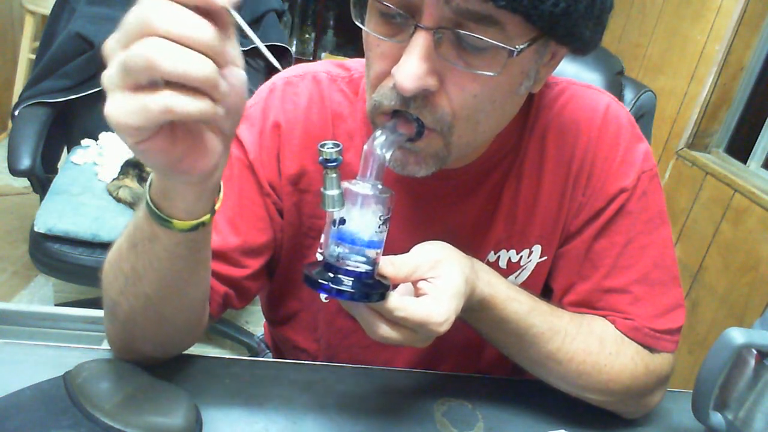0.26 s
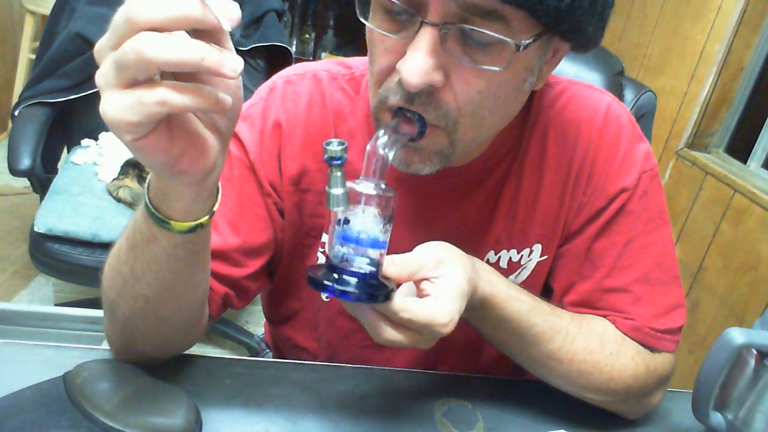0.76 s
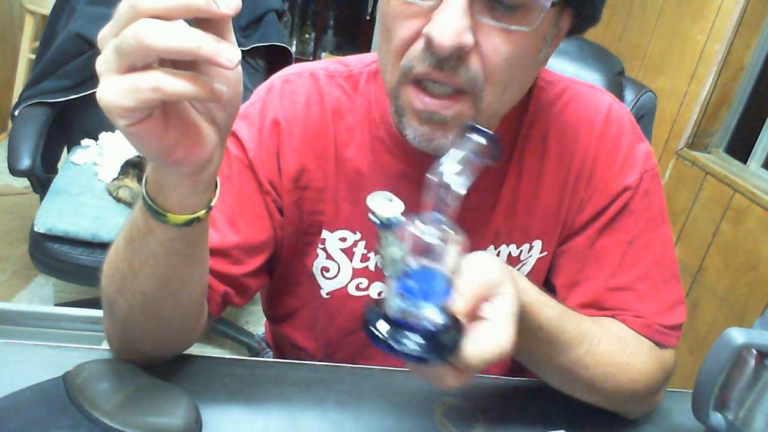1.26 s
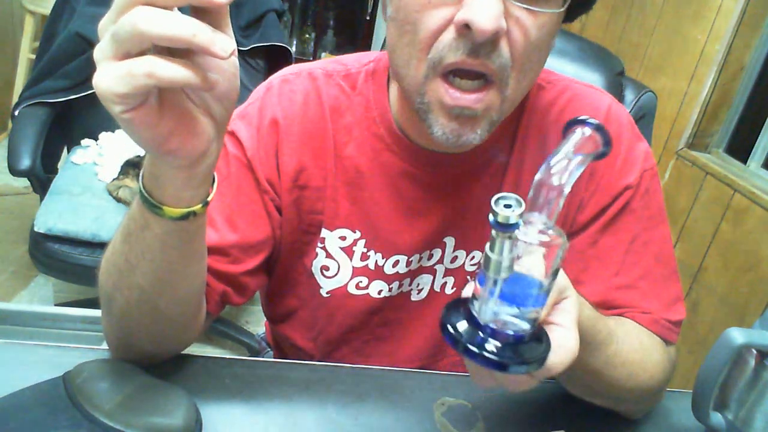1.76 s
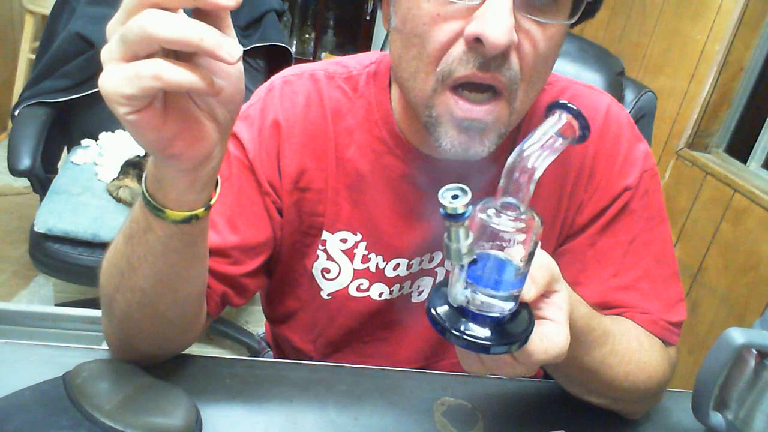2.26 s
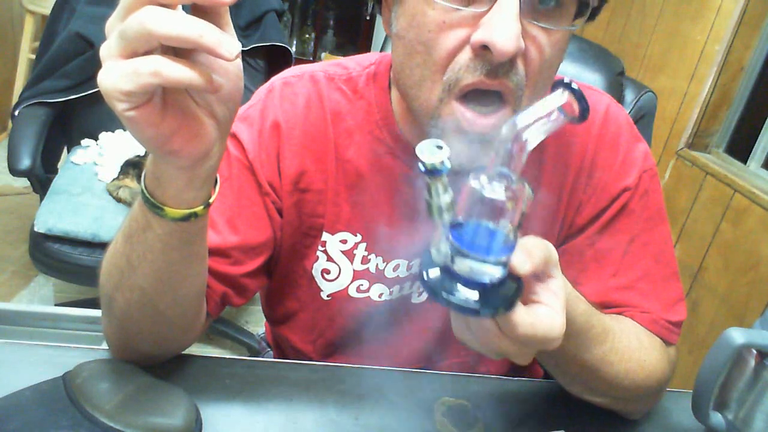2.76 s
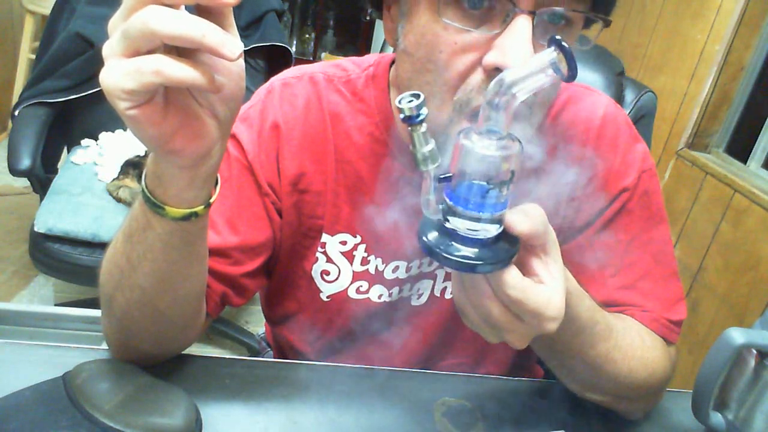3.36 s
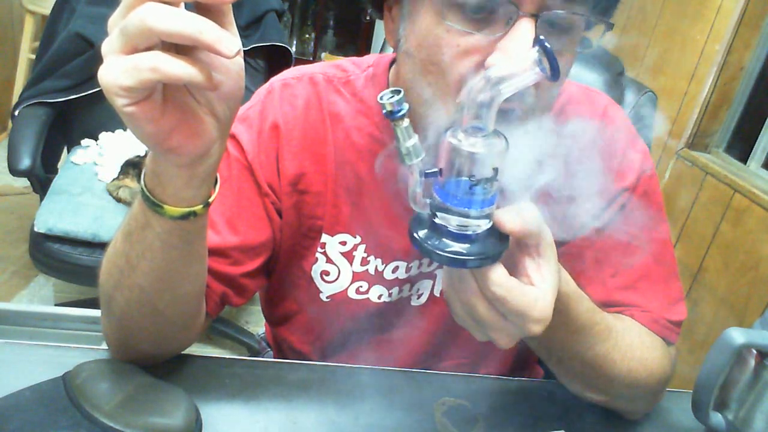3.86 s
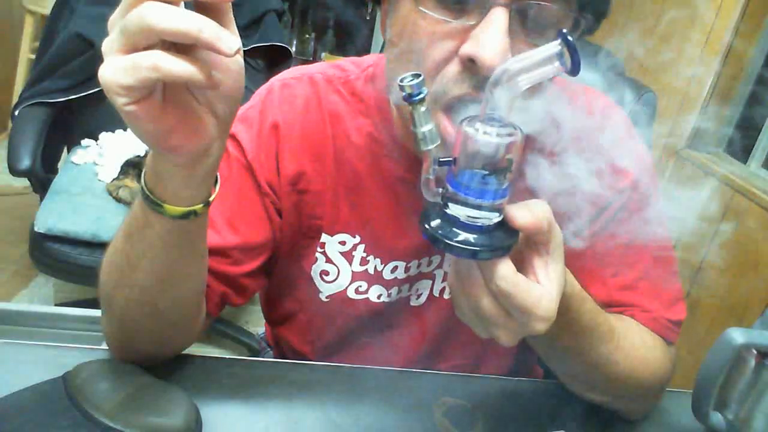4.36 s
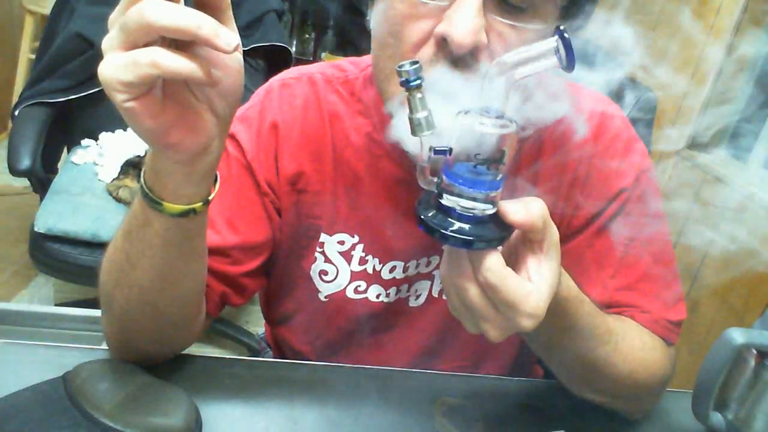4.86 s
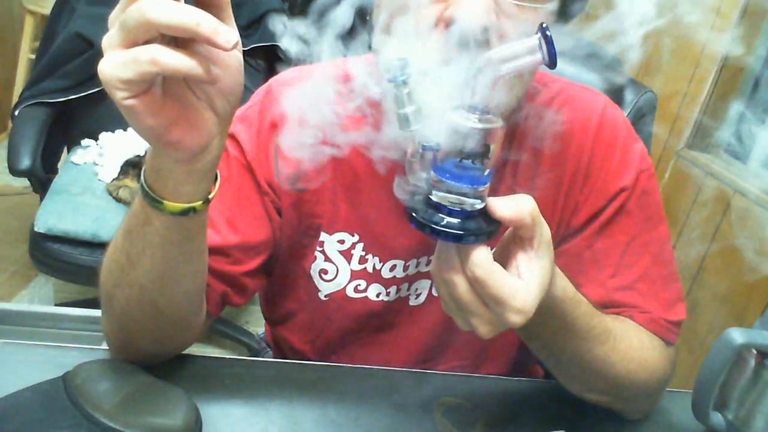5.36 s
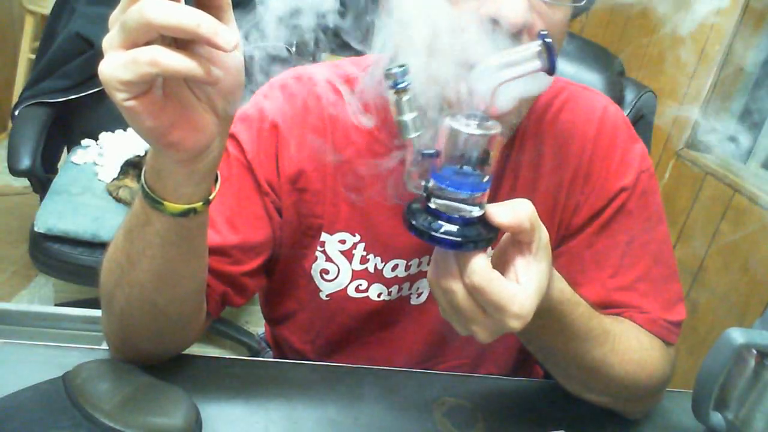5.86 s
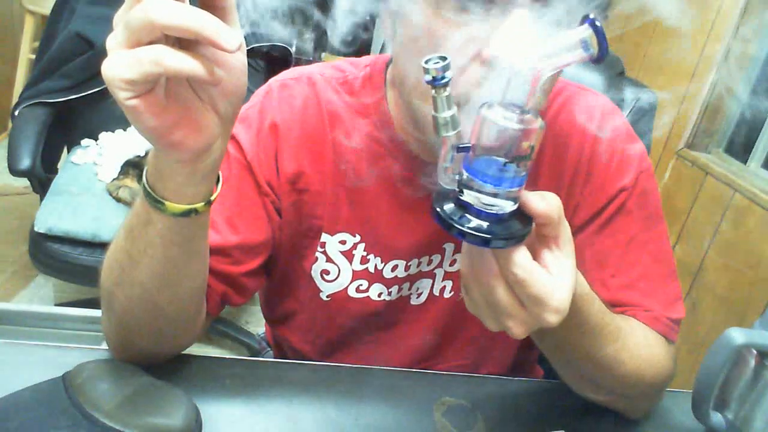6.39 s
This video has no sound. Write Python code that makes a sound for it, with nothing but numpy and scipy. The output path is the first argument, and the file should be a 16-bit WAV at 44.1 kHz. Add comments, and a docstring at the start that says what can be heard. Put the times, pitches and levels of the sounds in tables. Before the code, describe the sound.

From 0 to about 0.8 seconds, low rounded bubbles gurgle in a small glass water pipe, overlapping in a wet churn, with a narrow breathy high whistle strongest around 0.4 to 0.6 seconds. A small tick falls at 0.5, then a sharp one at 0.83 with a few weaker clicks until 1.0, and the bubbling is gone. All the way through to 6.6 seconds a fan rattles, nearly nine beats a second: dense, dry, hollow knocks around the midrange with light scraping fizz and occasional tiny pings. Motor and mains hum and soft room air sit below. Fainter ticks return near 4.1, 4.7 and 5.2. Very soft distant hoots appear near 1.5, 3.8 and 4.5, then higher, slightly rising ones at 5.8 and 6.3 to 6.6. The cheap close microphone adds steady hiss and thin whines, clearer around one second and after four; the small room gives a short reverberation.

```python
"""Rattling fan and a water pipe in a quiet room

A five-blade fan turns steadily; knocks and dense small blows of a loose part ring its housing every turn.
A small glass water pipe gurgles as decaying bubble tones and whistles as narrow noise for the first second.
It ticks sharply as it is put from the lips, with fainter ticks later; soft hoots come from far off.
Motors and mains hum under room air; a cheap microphone adds hiss, thin whines and an offset."""
import sys
import numpy as np
from scipy import signal
from scipy.fft import rfft, irfft
from scipy.io import wavfile
from scipy.ndimage import uniform_filter1d

SR = 44100
rng = np.random.default_rng(int(sys.argv[2]) if len(sys.argv) > 2 else 0)


def store_wav(level_fs):
    """Save 16-bit WAV to argv[1]."""
    pcm = np.round(np.clip(np.atleast_2d(level_fs), -1, 1) * 32767)
    wavfile.write(sys.argv[1], SR, pcm.T.astype(np.int16))


N = 292421

TURN_HZ, FIRST_KNOCK_S = 8.795, .030  # turns per second, and where the first turn begins
# Ringing modes of the fan housing. Each row: pitch in Hz, relative level in dB, t60 in seconds.
HOUSING_MODES = [(1150, -9, .05), (1190, -9, .05), (1230, -8, .05), (1290, -6.5, .05), (1345, -4, .05),
                 (1400, -3.5, .05), (1445, -5, .05), (1488, -3.5, .06), (1530, -4, .05), (1590, -2.5, .05),
                 (1645, -3, .05), (1700, -3, .05), (1760, -6, .05), (1830, -7.5, .05), (1940, -12, .06),
                 (2280, -19, .08), (2400, -17, .09), (2510, -15, .09)]
# The clearest knocks of the loose part. Each row: time in seconds, relative level in dB,
# pitch that the struck spot favours in Hz.
CLEAR_KNOCKS = [(0.0422, -45.8, 1460), (0.0601, -45.1, 1450), (0.0725, -47.1, 1510), (0.0921, -46.2, 1490),
                (0.1554, -43.7, 1440), (0.1865, -46.7, 1560), (0.2634, -44.0, 1490), (0.2755, -42.2, 1450),
                (0.2983, -47.3, 1490), (0.361, -47.5, 1510), (0.3807, -42.7, 1500), (0.412, -44.8, 1490),
                (0.437, -46.0, 1520), (0.489, -42.7, 1490), (0.5001, -43.0, 1460), (0.5327, -46.7, 1620),
                (0.6139, -42.5, 1480), (0.6251, -46.7, 1500), (0.6364, -45.7, 1520), (0.7222, -42.5, 1450),
                (0.7375, -43.5, 1530), (0.7512, -46.2, 1520), (0.8252, -42.5, 1550), (0.8416, -41.5, 1500),
                (0.8584, -45.3, 1580), (0.9469, -41.8, 1460), (0.9651, -42.7, 1540), (0.9856, -44.8, 1450),
                (1.0707, -42.9, 1430), (1.0899, -47.4, 1490), (1.1035, -45.7, 1510), (1.1723, -45.8, 1520),
                (1.1819, -42.9, 1470), (1.1897, -45.5, 1510), (1.2148, -46.9, 1570), (1.2359, -46.9, 1480),
                (1.29, -41.3, 1460), (1.3029, -43.1, 1560), (1.3167, -45.6, 1480), (1.3276, -46.3, 1550),
                (1.4049, -42.8, 1510), (1.4143, -46.0, 1520), (1.5144, -46.0, 1520), (1.5219, -42.5, 1460),
                (1.5334, -45.4, 1490), (1.5785, -45.0, 1430), (1.5905, -47.4, 1500), (1.6331, -41.6, 1450),
                (1.6472, -45.9, 1510), (1.6691, -46.3, 1510), (1.7494, -43.8, 1430), (1.7634, -45.2, 1480),
                (1.8093, -47.5, 1440), (1.8549, -43.3, 1550), (1.8715, -43.7, 1570), (1.9198, -45.4, 1490),
                (1.973, -43.4, 1470), (2.1007, -46.5, 1470), (2.1191, -46.6, 1550), (2.1463, -47.0, 1480),
                (2.1978, -46.1, 1510), (2.2065, -45.3, 1450), (2.2165, -46.5, 1490), (2.3141, -40.2, 1460),
                (2.3244, -44.0, 1440), (2.4503, -47.0, 1470), (2.4617, -45.8, 1590), (2.5386, -42.5, 1490),
                (2.5489, -41.5, 1480), (2.6659, -43.4, 1420), (2.6783, -45.3, 1530), (2.7639, -44.2, 1470),
                (2.7749, -46.4, 1450), (2.7943, -44.3, 1550), (2.8813, -45.3, 1500), (2.9128, -44.5, 1500),
                (2.9969, -41.4, 1490), (3.0168, -44.6, 1510), (3.0264, -45.9, 1520), (3.1063, -44.1, 1490),
                (3.1159, -42.7, 1450), (3.1354, -45.6, 1470), (3.231, -44.5, 1460), (3.2434, -47.4, 1470),
                (3.3372, -46.8, 1530), (3.3553, -43.5, 1410), (3.4474, -45.5, 1510), (3.4581, -44.7, 1410),
                (3.4723, -46.9, 1500), (3.5693, -40.8, 1450), (3.5799, -46.7, 1470), (3.6725, -45.2, 1490),
                (3.6921, -43.0, 1490), (3.7907, -43.0, 1500), (3.8084, -44.2, 1510), (3.8205, -45.4, 1500),
                (3.8366, -47.2, 1450), (3.9052, -43.1, 1480), (3.9221, -44.5, 1560), (4.0135, -46.1, 1520),
                (4.0222, -46.8, 1430), (4.1301, -44.6, 1470), (4.1418, -43.1, 1470), (4.1605, -45.9, 1490),
                (4.1807, -47.2, 1490), (4.2471, -44.7, 1460), (4.2637, -46.1, 1540), (4.2752, -47.3, 1510),
                (4.3537, -46.8, 1490), (4.3859, -46.3, 1450), (4.4716, -42.2, 1500), (4.4901, -44.9, 1490),
                (4.5117, -46.6, 1520), (4.6127, -45.3, 1610), (4.6963, -43.0, 1520), (4.7069, -43.6, 1460),
                (4.7269, -44.0, 1560), (4.814, -43.5, 1480), (4.8401, -47.2, 1500), (4.9346, -43.9, 1460),
                (5.0395, -43.2, 1500), (5.0512, -44.9, 1420), (5.1082, -46.4, 1480), (5.1553, -41.6, 1490),
                (5.1683, -43.1, 1490), (5.2746, -45.6, 1430), (5.2949, -46.2, 1480), (5.3287, -44.3, 1440),
                (5.3803, -42.0, 1500), (5.3985, -44.1, 1460), (5.4094, -45.7, 1530), (5.4201, -47.2, 1520),
                (5.4971, -44.8, 1460), (5.5119, -40.8, 1460), (5.6058, -44.9, 1450), (5.6144, -41.1, 1440),
                (5.6257, -43.7, 1490), (5.6715, -42.7, 1500), (5.7004, -46.3, 1430), (5.7267, -44.4, 1470),
                (5.7517, -46.7, 1460), (5.8427, -46.4, 1440), (5.8606, -46.0, 1450), (5.9559, -43.6, 1410),
                (5.9667, -46.5, 1520), (5.9782, -47.2, 1450), (6.0661, -43.9, 1410), (6.08, -46.8, 1530),
                (6.0906, -44.0, 1490), (6.105, -46.4, 1450), (6.1913, -42.7, 1500), (6.219, -46.6, 1520),
                (6.2313, -46.1, 1510), (6.2902, -42.9, 1500), (6.3088, -44.2, 1510), (6.3227, -46.5, 1500),
                (6.4073, -44.9, 1470), (6.4157, -45.5, 1420), (6.4341, -47.1, 1530), (6.4537, -46.0, 1530),
                (6.5136, -45.0, 1490), (6.5268, -44.9, 1460)]


def undb(db):
    """Gain of a level in dB."""
    return 10 ** (np.asarray(db) / 20)


def level(x, db):
    """Scale a sound to an rms level in dB."""
    return x * undb(db) / np.sqrt(np.mean(x ** 2))


def curve(table):
    """Draw the columns of a (seconds, value, ..) table as sample-by-sample automation."""
    s, *columns = np.transpose(table)
    return [np.interp(np.arange(N) / SR, s, column) for column in columns]


def coloured(points):
    """Noise shaped by (Hz, dB) points, joined on a log pitch axis and flat beyond the ends."""
    hz, db = np.transpose(points)
    bins_hz = np.maximum(np.arange(N // 2 + 1) * SR / N, 1)
    gain = undb(np.interp(np.log(bins_hz), np.log(hz), db))
    return irfft(rfft(rng.standard_normal(N)) * gain, N)


def band(x, lo_hz, hi_hz):
    """Band-pass with gentle slopes."""
    return signal.sosfilt(signal.butter(2, [lo_hz, hi_hz], "band", fs=SR, output="sos"), x)


def ring(x, hz, t60, rise_s):
    """One mode that builds up over the contact time and then decays."""
    spin = 2j * np.pi * hz / SR
    onset = np.exp(spin - 1 / (rise_s * SR))
    decay = np.exp(spin - np.log(1000) / (t60 * SR))
    return signal.lfilter([1 - abs(onset)], np.poly([onset, decay]), x).imag


def walk(rate):
    """Random levels held for 1 / rate seconds and slewed twice."""
    k = int(SR / rate)
    steps = np.repeat(rng.standard_normal(N // k + 1), k)
    return uniform_filter1d(uniform_filter1d(steps, k), k)[:N]


def rattle(per_s=2500, scatter_db=0.5, chatter_db=-55.5, knock_db=5.0, damped=1.12, choke_s=.0013,
           tap_s=0.00066, jolt_db=32, bounce_s=0.0084, scrape_db=-67, fizz_db=-71):
    """Dense small blows and some clear soft knocks ring the housing; the rubbing also hisses."""
    # How hard the loose part chatters through one turn. Each row: share of the turn, relative level in dB.
    chatter_shape = [(0, -19), (.05, -3), (.1, 3), (.22, 2), (.35, 1.5), (.45, -1.5), (.55, -1), (.62, 0.5),
                     (.72, -1.5), (.85, -3), (1, 3)]
    turn = (np.arange(N) / SR - FIRST_KNOCK_S) * TURN_HZ % 1
    force = undb(np.interp(turn, *np.transpose(chatter_shape)))
    s, db, hz = knock_list()
    at = np.clip(((s - .0001) * SR).astype(int), 0, N - 1)  # first contact, just ahead of the listed time
    # each knock shakes the loose part, which bounces on for a moment
    jolt = np.zeros(N)
    jolt[at] = undb(db + jolt_db)
    shake = force + signal.lfilter([1], [1, -np.exp(-1 / (bounce_s * SR))], jolt)
    struck = rng.random(N) < per_s / SR
    blows = shake * struck * undb(scatter_db * rng.exponential(size=N))
    chatter = 0
    for mode_hz, mode_db, t60 in HOUSING_MODES:
        # every blow lands elsewhere, so it shares itself out anew among the modes
        chatter = chatter + undb(mode_db) * ring(blows * rng.standard_normal(N), mode_hz, t60, tap_s)
    knocks = knock_rings(at, db, hz, damped, choke_s)
    scrape = band((0.45 * blows + 1.5 * shake) * rng.standard_normal(N), 1800, 8100)
    fizz = band(force * rng.standard_normal(N), 5950, 7840)
    rubbing = level(scrape, scrape_db) + level(fizz, fizz_db)
    return level(chatter, chatter_db) + undb(knock_db) * knocks + rubbing


def knock_list():
    """The clear knocks, then the lighter rebounds of every turn: times, levels, pitches."""
    # Lighter knocks later in every turn. Each row: first share of the turn, last share,
    # relative level in dB, favoured pitch in Hz.
    rebound_rows = [(.25, .42, -50, 1680), (.52, .64, -51, 1480)]
    scatter_db, scatter_hz = 2, 109
    rows = [np.transpose(CLEAR_KNOCKS)]
    for first, last, db, hz in rebound_rows:
        s, a, b = each_turn(first, last, count=1)
        rows.append([s, db + scatter_db * a, hz + scatter_hz * b])
    return np.hstack(rows)


def knock_rings(at, db, hz, damped, choke_s):
    """Each knock rings the modes near its spot, until the next clear knock chokes it."""
    spot_hz, contact_s, slur_rad = 46, .0011, .3  # width of the favoured band, contact time, phase scatter
    mode_hz, _, t60 = np.transpose(HOUSING_MODES)
    t = np.arange(int(.06 * SR)) / SR
    share = np.exp(-((mode_hz - hz[:, None]) / spot_hz) ** 2)
    share = share / share.sum(axis=1, keepdims=True)
    share = share * np.exp(1j * slur_rad * rng.standard_normal(share.shape))
    modes = np.exp(np.outer(2j * np.pi * mode_hz - np.log(1000) / (damped * t60), t))
    modes = modes * (1 - np.exp(-t / contact_s))
    # time each knock has before the next clear one; the last rings freely
    clear = np.append(at[:len(CLEAR_KNOCKS)], 2 * N)
    free_s = (clear[np.searchsorted(clear, at, side="right")] - at) / SR
    choke = np.exp(-np.maximum(t - free_s[:, None], 0) / choke_s)
    rings = undb(db)[:, None] * (share @ modes).imag * choke
    out = np.zeros(N + len(t))
    np.add.at(out, at[:, None] + np.arange(len(t)), rings)
    return out[:N]


def each_turn(first, last, count):
    """Random times between two shares of every turn, with two normal draws for each."""
    turns = np.repeat(np.arange(int(N / SR * TURN_HZ)), count)
    share = first + (last - first) * rng.random(len(turns))
    return FIRST_KNOCK_S + (turns + share) / TURN_HZ, *rng.standard_normal((len(turns), 2)).T


def pings(gain_db=-6.0):
    """Soft blows ring the highest housing mode alone, with a fluttering level."""
    # Pings at set times. Each row: time in seconds, relative level in dB.
    set_pings = [(0.5417, -63), (0.826, -61), (3.0086, -62), (3.1158, -58), (3.4513, -60), (4.0396, -55),
                 (4.26, -54), (4.8234, -52), (5.4116, -51), (5.645, -68), (5.737, -61), (6.1045, -68),
                 (6.2986, -57), (6.4213, -60)]
    # once a turn the housing is also touched faintly, soon after the turn's start
    brush_s, scatter, _ = each_turn(.1, .45, count=1)
    brush_db = -64 + 1.5 * scatter
    s, db = np.hstack([[brush_s, brush_db], np.transpose(set_pings)])
    hit = np.zeros(N)
    hit[np.minimum((s * SR).astype(int), N - 1)] = undb(db + gain_db)
    hz, _, t60 = HOUSING_MODES[-1]
    return ring(hit, hz, t60, 0.0016) * undb(3.7 * walk(120))


def pipe(t60=0.13, gain_db=-2.3, churn_db=5.0):
    """Big bubbles thump the churning water; air whistles through the narrow stem."""
    # Big bubbles. Each row: time in seconds, relative level in dB, pitch in Hz.
    bubble_rows = [(0.011, -43, 241), (.052, -44, 241.6), (0.099, -46, 208), (.13, -42.5, 175),
                   (0.176, -48, 177), (0.196, -43.5, 215), (0.259, -44, 254), (.35, -47.5, 171),
                   (0.401, -51, 222), (0.491, -43, 222), (0.538, -42, 211), (0.619, -55, 189),
                   (0.679, -47, 184), (0.716, -41.5, 217), (.765, -61, 176)]
    # Air drawn through the pipe. Each row: time in seconds, whistle level in dB, whistle pitch in Hz.
    draw_curve = [(0, -73, 6750), (.2, -71, 6710), (.3, -73, 6700), (.38, -65.5, 6570), (.55, -66, 6600),
                  (.75, -73, 6600), (.85, -78, 6540), (1.0, -90, 6530)]
    gurgle = 0
    for s, db, hz in bubble_rows:
        push = np.zeros(N)
        push[int(s * SR)] = undb(db + gain_db)
        gurgle = gurgle + ring(push, hz, t60, 0.0056)
    draw_db, whistle_hz = curve(draw_curve)
    # slow complex noise smears the whistle into a breathy band around its pitch
    breathy = band(rng.standard_normal(N), 6, 70) + 1j * band(rng.standard_normal(N), 5.5, 64)
    carrier = np.exp(2j * np.pi * np.cumsum(whistle_hz) / SR)
    whistle = undb(2.0 * walk(31.6)) * (breathy * carrier).real
    churn = undb(3.6 * walk(25)) * band(rng.standard_normal(N), 140, 400)
    return gurgle + undb(draw_db) * (level(whistle, 0) + level(churn, churn_db))


def ticks(gain_db=0.0, t60=0.0066, snap=1.3):
    """Short broad cracks, each a fast-dying tone with a hard edge and a thin rattling tail."""
    # Sharp ticks. Each row: time in seconds, relative level in dB.
    tick_rows = [(0.491, -36), (0.8265, -30.5), (0.8462, -38.5), (.9572, -42), (1.0101, -46), (2.5376, -50),
                 (4.1312, -38), (4.4712, -50), (4.697, -46), (5.157, -40), (5.3807, -60), (6.0377, -63)]
    hit = np.zeros(N)
    for s, db in tick_rows:
        hit[int(s * SR)] = -undb(db + gain_db)
    t = np.arange(int(.05 * SR)) / SR
    crack = np.cos(2 * np.pi * 1500 * t) * np.exp(-np.log(1000) * t / t60)
    crack[:2] += snap * np.array([1, -1])  # the hard edge of first contact
    tail = 0.07 * rng.standard_normal(len(t)) * np.exp(-np.log(1000) * t / 0.06)
    return band(signal.fftconvolve(hit, crack + tail)[:N], 500, 9700)


def hoots():
    """Soft far-off tones that glide quickly, settle, swell, waver and fade."""
    # Faint hoots. Each row: start in seconds, length in seconds, start pitch in Hz, end pitch in Hz,
    # relative level in dB.
    hoot_rows = [(1.45, .25, 535, 535, -74), (3.78, .2, 530, 535, -70), (4.46, .12, 560, 540, -72),
                 (5.78, .16, 715, 745, -64), (5.81, .13, 820, 855, -68), (6.3, .11, 695, 765, -61),
                 (6.43, .14, 740, 765, -59.5)]
    out = np.zeros(N)
    for s, length, start_hz, end_hz, db in hoot_rows:
        i, n = int(s * SR), int(length * SR)
        glide_hz = end_hz + (start_hz - end_hz) * np.linspace(1, 0, n) ** 2
        tone = np.sin(2 * np.pi * np.cumsum(glide_hz) / SR) * signal.windows.tukey(n, .5)
        out[i:i + n] += (np.sqrt(2) * undb(db) * tone)[:N - i]
    return out * undb(1.3 * walk(30))


def room(x, t60=0.23, wet_db=-12):
    """Direct sound and a short diffuse tail of decaying noise."""
    t = np.arange(int(.4 * SR)) / SR
    tail = rng.standard_normal(len(t)) * np.exp(-np.log(1000) * t / t60) * (t > .004)
    return x + undb(wet_db) * signal.fftconvolve(x, tail / np.sqrt(np.sum(tail ** 2)))[:N]


def tones(table, waver_db):
    """Steady sine lines of (Hz, dB rms), each wavering slowly in level."""
    t = np.arange(N) / SR
    out = np.zeros(N)
    for hz, db in table:
        gain = np.sqrt(2) * undb(db + waver_db * walk(4.2))
        out += gain * np.sin(2 * np.pi * (hz * t + rng.random()))
    return out


def hum():
    """Blades, motors and mains hum as steady low lines."""
    # Hum lines. Each row: pitch in Hz, rms level in dB.
    hum_lines = [(17.09, -83), (44.0, -63), (60.01, -69), (87.99, -77), (120.79, -70), (175.95, -70.5),
                 (240.02, -72), (245.45, -64), (360.01, -72.5)]
    return tones(hum_lines, 1.15)


def room_air():
    """Room tone as coloured noise that drifts in level."""
    # Spectrum of the air. Each row: frequency in Hz, relative level in dB.
    air_spectrum = [(12, -44), (25, -15.5), (45, -14.5), (70, -25.5), (80, -14), (100, -22), (220, -20),
                    (400, -26), (535, -23), (640, -25.5), (850, -23.5), (1050, -24), (2000, -31.5),
                    (3000, -49)]
    return level(band(coloured(air_spectrum), 6.1, 6800) * undb(0.51 * walk(7.4)), -54)


def draught():
    """A draught sways the microphone membrane below hearing."""
    return level(band(rng.standard_normal(N), 3.3, 10.0), -69)


def whines():
    """The electronics whine in thin high lines that swell and recede together."""
    # Whine lines. Each row: pitch in Hz, level in dB before the swell.
    whine_lines = [(6600.41, -75), (6750.14, -84), (8000.38, -68), (9870.86, -75), (10125.2, -90)]
    # Common swell of the whines. Each row: time in seconds, gain in dB.
    swell_curve = [(0, -30), (1, -4), (1.6, -11), (3.5, -16), (4.3, -2.5), (6.3, -1.5), (6.63, -15)]
    return undb(curve(swell_curve)[0]) * tones(whine_lines, 0.95)


def mic_hiss():
    """The microphone hisses as coloured noise."""
    # Spectrum of the hiss. Each row: frequency in Hz, relative density in dB per Hz.
    hiss_spectrum = [(1530, -49), (2600, -2.5), (4250, -9), (5920, -6.5), (8270, 0.5), (9310, 0.5),
                     (10500, -3), (11700, -22.5), (15200, -62), (22000, -120)]
    return level(band(coloured(hiss_spectrum), 1600, 15800), -59.5)


def scene():
    """Fan rattle, pipe and hoots ring in the room, over hum, air and draught."""
    in_room = room(rattle() + pings() + ticks() + pipe() + hoots())
    return (in_room + hum() + room_air() + draught())[None]


def record(dry):
    """The microphone adds hiss and whines, cuts the top steeply and adds a constant offset."""
    top_hz, offset = 11600, -.0299
    top_cut = signal.ellip(8, .2, 60, top_hz, fs=SR, output="sos")
    return signal.sosfilt(top_cut, dry + mic_hiss() + whines()) + offset


dry = scene()
out = record(dry)
store_wav(out)
```